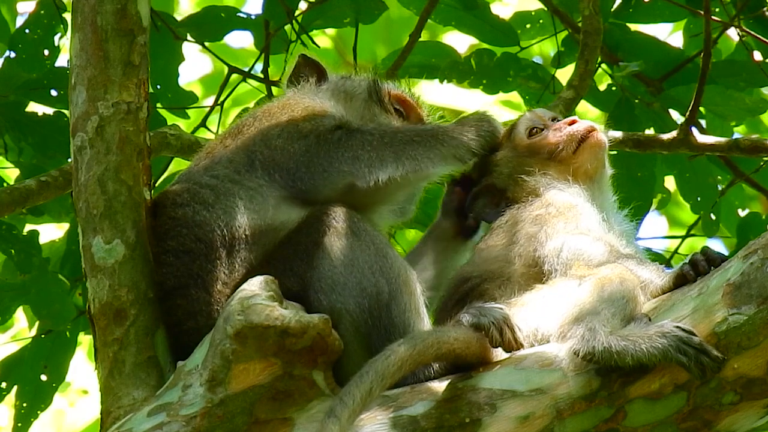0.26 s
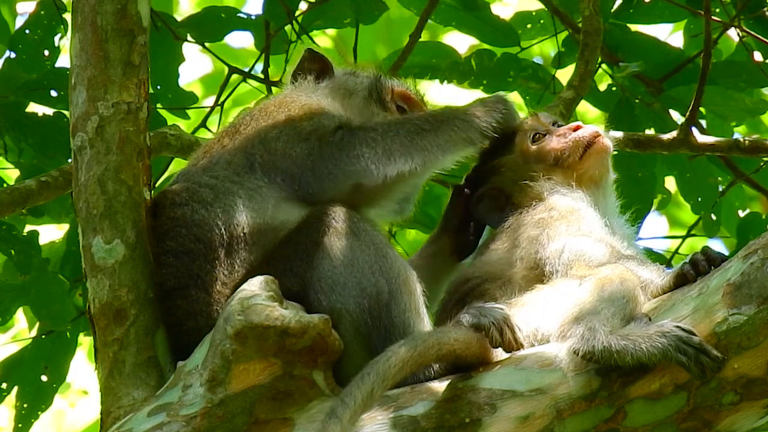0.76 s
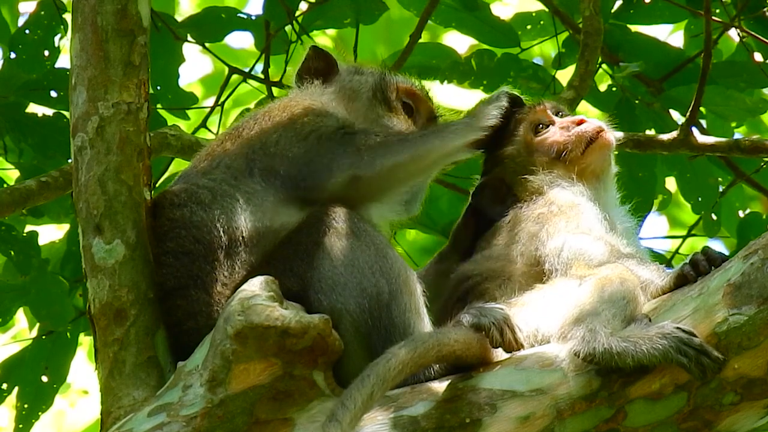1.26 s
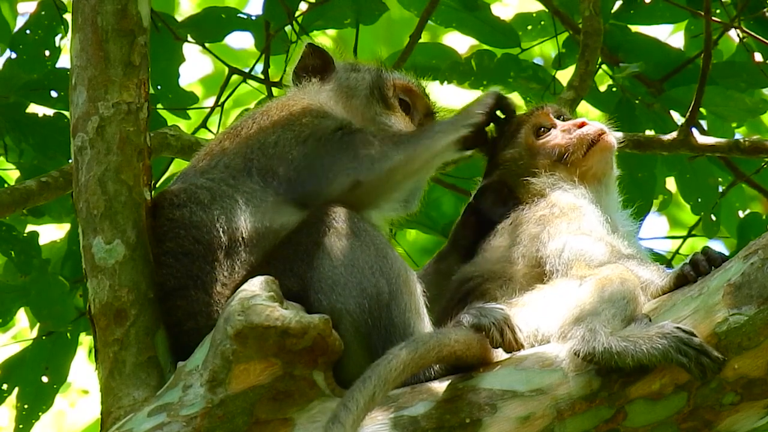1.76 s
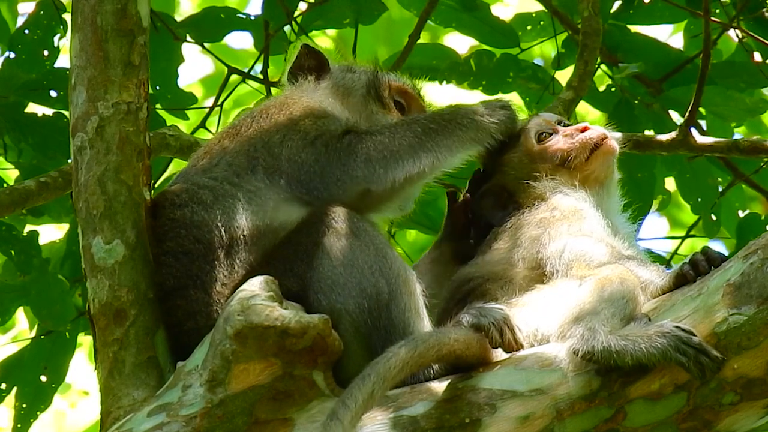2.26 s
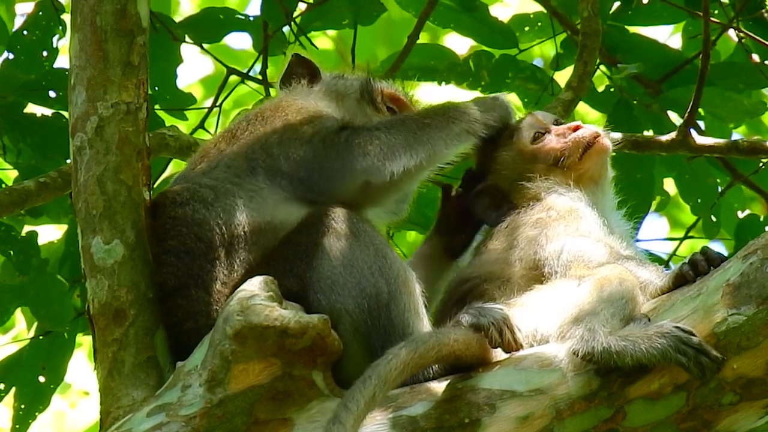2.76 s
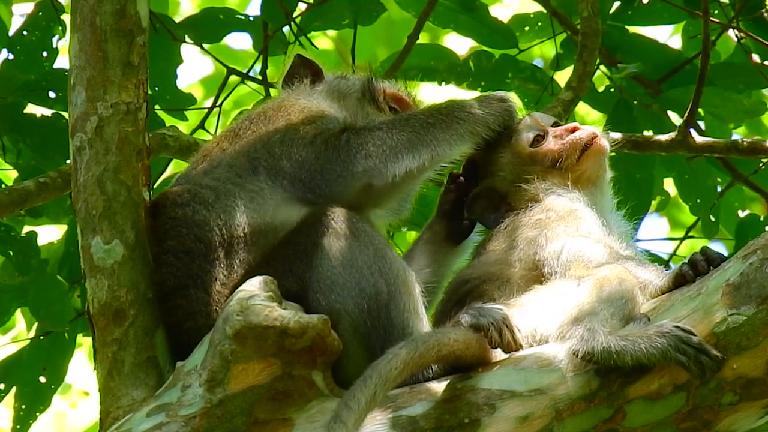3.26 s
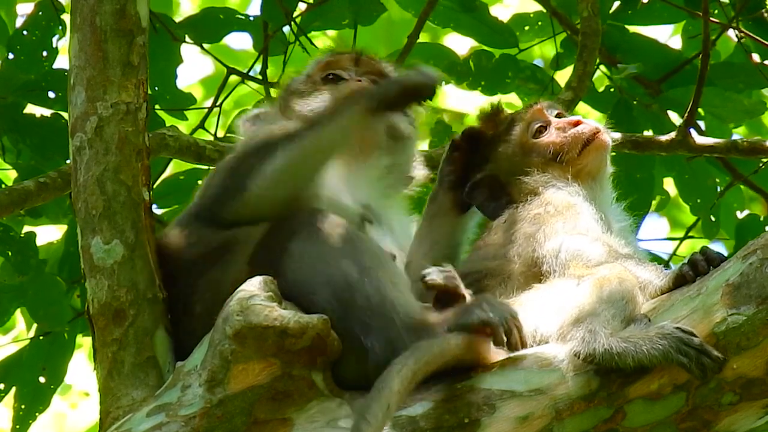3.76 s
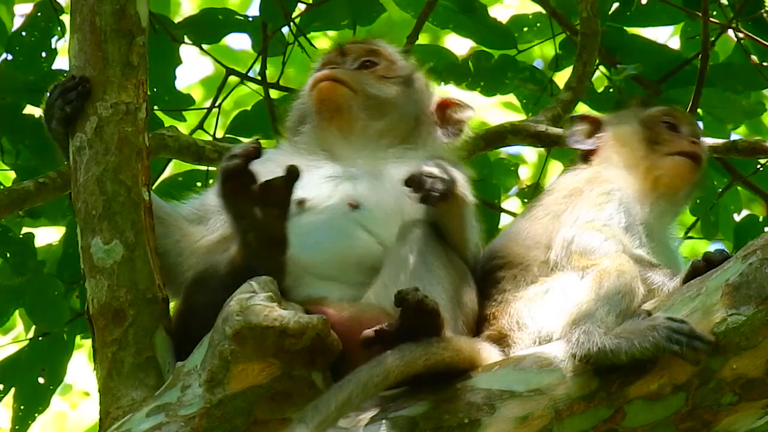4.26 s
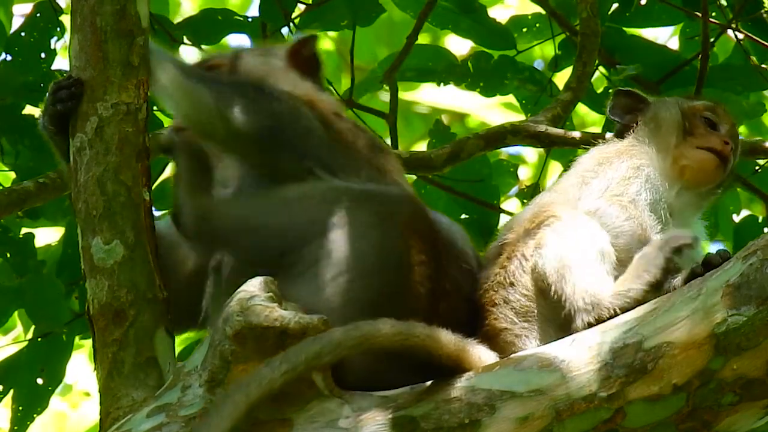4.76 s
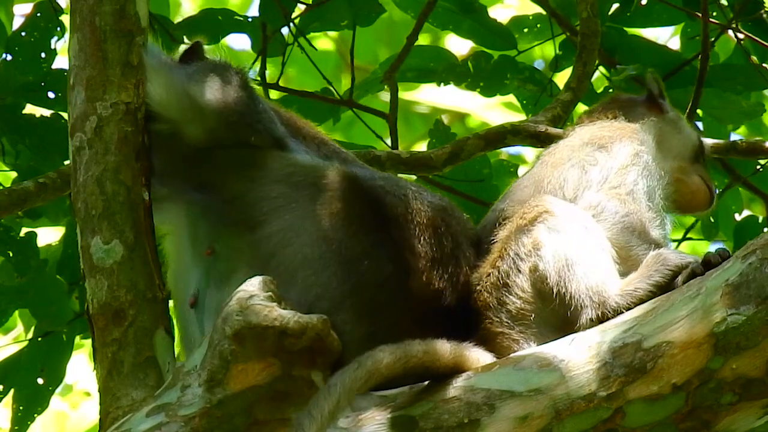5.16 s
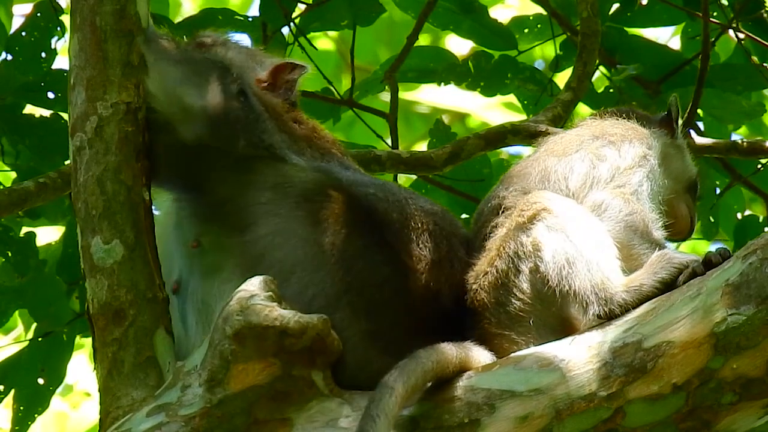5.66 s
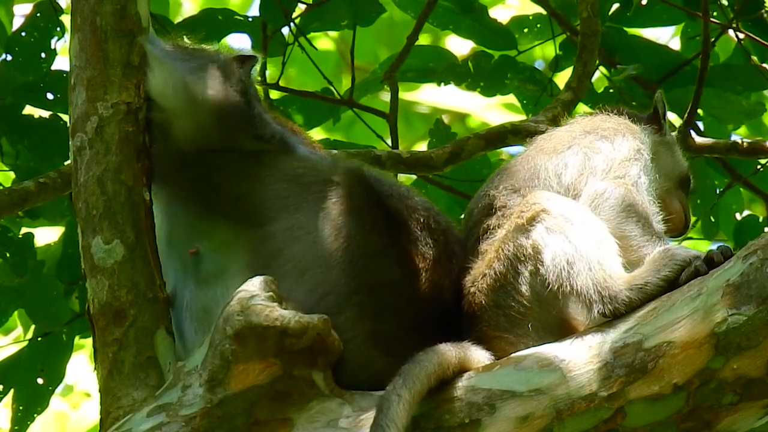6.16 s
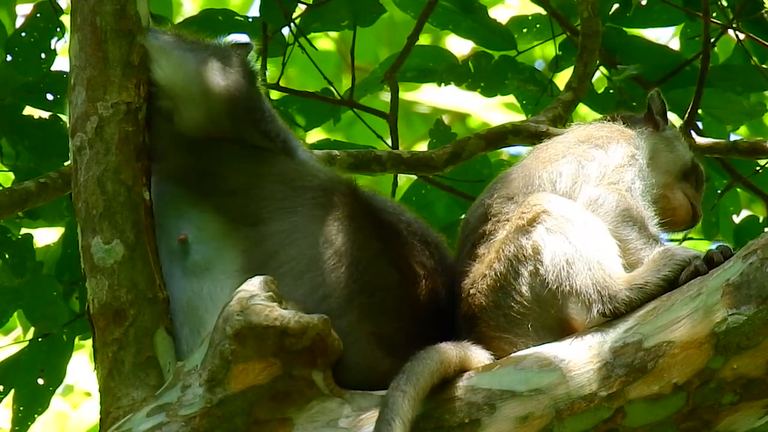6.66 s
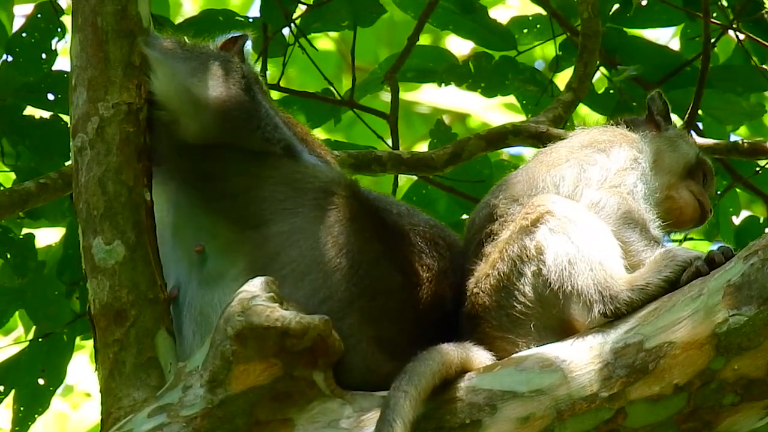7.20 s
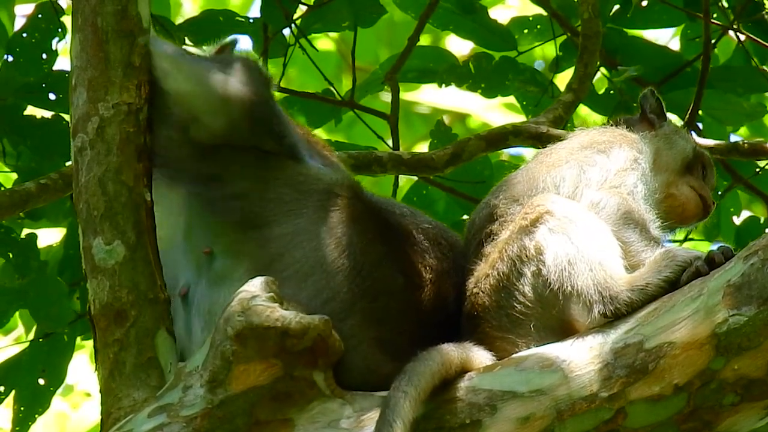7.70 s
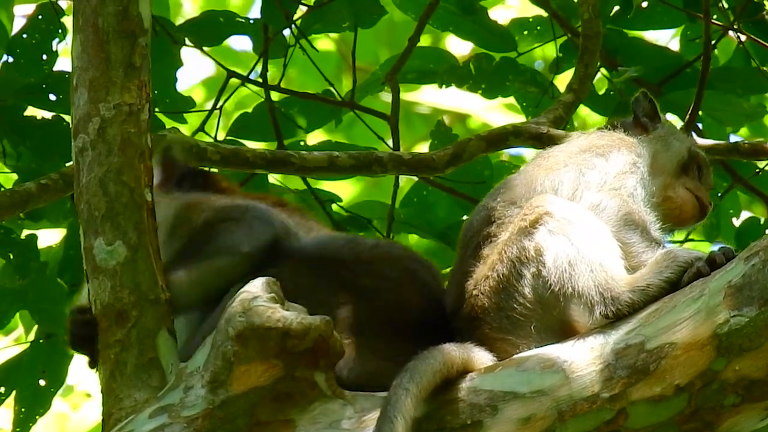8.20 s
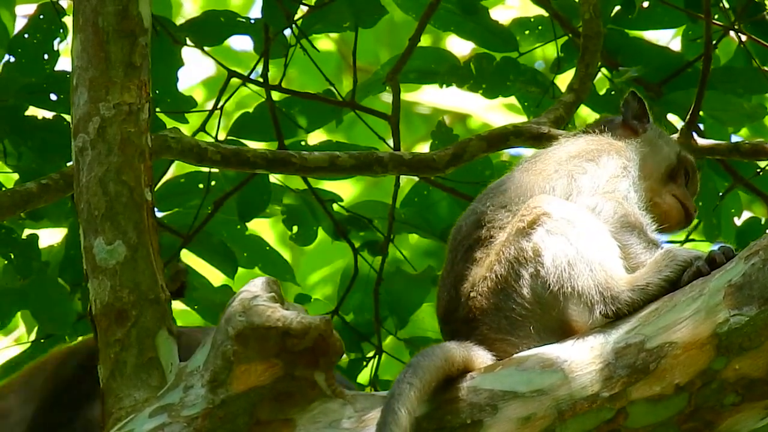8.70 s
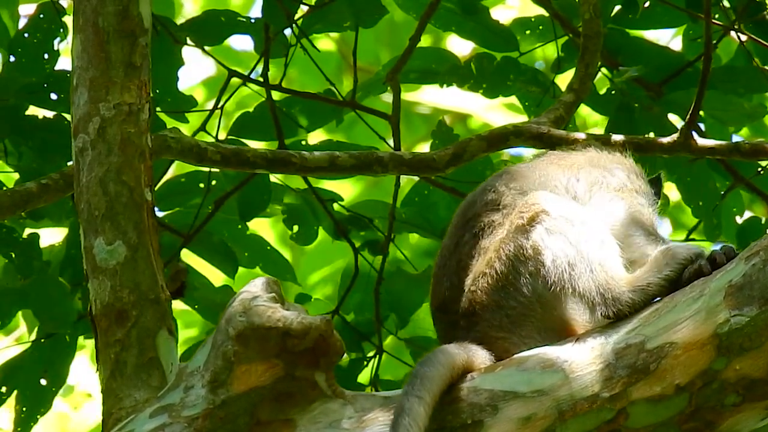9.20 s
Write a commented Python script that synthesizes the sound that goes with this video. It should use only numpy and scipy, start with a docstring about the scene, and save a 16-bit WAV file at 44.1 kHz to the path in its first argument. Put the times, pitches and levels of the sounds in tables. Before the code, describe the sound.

A tropical forest heard in wide stereo from beneath the canopy. Throughout, cicadas hold a piercing, glassy whine near seven kilohertz, trembling about eleven times a second and smeared by tree echoes, slightly left, over a low rumble, faint wavering hum and even hiss. At 0.3 seconds a bird gives a short, harsh rising call, repeated near 2.5, 4.7, 6.7 and 8.7, each with a faint echo. A distant rattling trill runs until about 2.4 and returns after 7.9; thin high chirps rise near 1.2. From 2.1 a whistler sends low, falling slurs and quick arched phrases, pausing around 4.5 to 5.7, then growing frequent to the end. Buzzy sagging chirps dot the distance, clearer after 6.7. Tiny dry leaf rustles occur throughout, with a longer soft stir around 4.4, a blunt knock at 6.45 and crisp rustling just after.

```python
"""Cicadas and birds in a tropical forest

Cicadas whine without pause: tymbal overtones swing eleven times a second, blurred by echoes from the trees.
One bird whistles low slurred phrases as bending tones; another repeats a call of tone and harsh noise.
Farther off, fluttering tones chirp and pulsing noise trills. Leaves rustle now and then in grainy noise,
over a low distant rumble, a wavering hum and the even hiss of the canopy."""
import sys
import numpy as np
from scipy import signal
from scipy.fft import rfft, irfft, next_fast_len
from scipy.io import wavfile
from scipy.ndimage import uniform_filter1d, map_coordinates

SR = 44100
rng = np.random.default_rng(int(sys.argv[2]) if len(sys.argv) > 2 else 0)


def unload_wav(signal):
    """Save mono or channel-first audio to the path in sys.argv[1] as 16-bit WAV at rate SR, clipped to [-1, 1]."""
    wavfile.write(
        sys.argv[1],
        SR,
        np.round(np.clip(np.atleast_2d(signal).T, -1, 1) * 32767).astype(np.int16),
    )


N = 416304  # samples, about 9.4 s


def amp(db):
    """Decibels to gain."""
    return 10 ** (np.asarray(db) / 20)


def unit(x):
    """Scale to rms 1."""
    return x / np.sqrt(np.mean(x ** 2) + 1e-20)


def along(points, hz):
    """Read a curve of (frequency, value) points on a log frequency axis."""
    point_hz, value = np.transpose(points)
    return np.interp(np.log(hz + 1), np.log(point_hz + 1), value)


def curves(rows):
    """One value per sample for each column after the time."""
    time_s, *columns = np.transpose(rows)
    return [np.interp(np.arange(N) / SR, time_s, column) for column in columns]


def wobble(rate):
    """A smooth random curve through normal knots, rate knots a second."""
    knots = rng.standard_normal(int(N * rate / SR) + 4)
    return map_coordinates(knots, [np.arange(N) * rate / SR])


def phase_of(hz):
    """Running phase of a moving frequency, in radians."""
    return 2 * np.pi * np.cumsum(hz) / SR


def filtered(x, response):
    """Multiply the spectrum of x by a response of frequency, without shifting phase."""
    size = next_fast_len(x.shape[-1] + 8192)
    spectrum = rfft(x, size) * response(np.fft.rfftfreq(size, 1 / SR))
    return irfft(spectrum, size)[..., :x.shape[-1]]


# likeness of left and right in sound from all around: (pitch_hz, likeness)
LEFT_RIGHT_LIKENESS = [(40, .98), (80, 0.96), (170, 0.67), (350, 0.6), (700, 0.67), (1400, 0.74),
                       (2800, 0.77), (5500, 0.25), (9000, 0), (15000, 0.18)]


def diffuse(size):
    """Stereo noise from all around: alike in the bass, mostly unrelated in the treble."""
    def mid_side_gains(hz):
        turn = np.arccos(np.clip(along(LEFT_RIGHT_LIKENESS, hz), -1, 1)) / 2
        return np.array([np.cos(turn), np.sin(turn)])

    mid, side = filtered(rng.standard_normal((2, size)), mid_side_gains)
    return np.array([mid + side, mid - side])


def rush(spectrum):
    """Coloured stereo noise of rms 1."""
    return unit(filtered(diffuse(N), lambda hz: amp(along(spectrum, hz))))


def forest(x, t60, wet_db, echo_s=0.12, echo_db=-40):
    """Direct sound, scatter from trunks and leaves, and a smeared echo from a farther stand of trees."""
    t = np.arange(SR) / SR
    decay = amp(-60 * t / t60)  # t60: seconds to fall by 60 dB
    far_stand = amp(echo_db) * np.exp(-((t - echo_s) / 0.048) ** 2)
    tail = diffuse(SR) * (decay + far_stand)
    tail *= amp(wet_db) / np.sqrt(np.sum(tail ** 2) / 2)  # wet_db: scatter over direct sound
    tail[:, 0] += 1  # the direct sound
    heard = signal.fftconvolve(np.atleast_2d(x), tail, axes=1)[:, :x.shape[-1]]
    return heard / np.sqrt(1 + amp(2 * wet_db))


def trunks(x, spread_s, db, count):
    """A few distinct copies thrown back by tree trunks, later ones weaker."""
    delays_s = spread_s * (np.arange(count) + rng.uniform(.3, 1, count)) / count
    copies = sum(amp(db - 6 * d / spread_s) * np.pad(x, (int(d * SR), 0))[:N] for d in delays_s)
    return x + copies


def swell(s, length, taper):
    """Sample indices, progress 0-1 and envelope of one note; more taper makes a softer start and end."""
    index = np.arange(max(int(s * SR), 0), min(int((s + length) * SR), N))
    progress = np.linspace(0, 1, len(index))
    return index, progress, np.abs(np.sin(np.pi * progress)) ** taper


def notes(rows, haze, flutter_rate, taper):
    """Tones that bend through three pitches; a share of each flutters at random into a band of haze."""
    out = np.zeros(N)
    random_turn = wobble(flutter_rate) + 1j * wobble(flutter_rate)
    flutter = np.sqrt(1 - haze) + np.sqrt(haze / 2) * random_turn
    for s, length, start, middle, end, db in rows:
        index, progress, shape = swell(s, length, taper)
        bend = np.polyfit([0, .5, 1], [start, middle, end], 2)
        hz = np.polyval(bend, progress)
        tone = np.real(flutter[index] * np.exp(1j * phase_of(hz)))
        out[index] += amp(db) * np.sqrt(2) * shape * tone
    return out


# overtones 4 to 7 of the tymbal rate, loudest at the fifth where the body rings: (level_db)
TYMBAL_OVERTONES = [-24.5, 2, -32, -43]


def cicada(rate_hz, swing_hz, swing_rate, t60, wet_db, jitter_hz):
    """Tymbal overtones swing in pitch; echoes of earlier swings beat against the present one."""
    swing = np.sin(phase_of(swing_rate * (1 + .035 * wobble(5))))
    phase = phase_of(rate_hz + swing_hz * swing + jitter_hz * wobble(150))
    # the overtone below the body resonance grows as the swing lifts it closer
    lift_db = 2.5 * swing + 2 * wobble(5) - 2.5
    song = np.zeros(N)
    for overtone, db in zip(range(4, 8), TYMBAL_OVERTONES):
        extra_db = lift_db if overtone == 4 else 0
        song += amp(db + extra_db) * np.sin(overtone * phase)
    # a second of song beforehand, so the trees already ring at the start
    heard = forest(np.pad(song, (SR, 0), mode="reflect"), t60, wet_db)[:, SR:]
    # the drone holds its strength from one second to the next
    power = uniform_filter1d(heard ** 2, int(.7 * SR), axis=1)
    return heard / np.sqrt(np.abs(power) + 1e-12)


# cicadas near and far, each gliding once to a new tymbal rate: (glide_start_s, glide_end_s, first_rate_hz,
# last_rate_hz, swing_hz, swings_per_s, level_db under the chorus, scatter_db over direct, jitter_hz)
CICADA_SINGERS = [(3.6, 5.6, 1454.5, 1459.3, 15, 11, 0, 10.5, 1.4),
                  (0, 8.5, 1501, 1518, 17, 10.6, -17.5, 15, 2.5),
                  (6, 8.2, 1448, 1431, 17, 11.4, -23, 15, 2.5),
                  (0, 9.4, 1552, 1560, 18, 11.2, -35.5, 15, 2.5)]
# strength of the whole chorus: (time_s, level_db)
CHORUS_STRENGTH = [(0, -35.5), (0.7, -33.5), (1.5, -35.5), (2.3, -35), (3.6, -34.5), (4.8, -34.0),
                   (6.3, -34), (7.7, -34), (9.4, -34.5)]
WAVER_DB, LEFT_DB = 1, 1.07  # wavering at each ear; gain at the left, loss at the right


def cicadas():
    """Four cicadas at different distances, a little to the left; the far ones are nearly all scatter."""
    chorus = np.zeros((2, N))
    for start, end, first_hz, last_hz, swing_hz, swing_rate, db, wet_db, jitter_hz in CICADA_SINGERS:
        rate_hz, = curves([(start, first_hz), (end, last_hz)])
        chorus += amp(db) * cicada(rate_hz, swing_hz, swing_rate, t60=1.0, wet_db=wet_db, jitter_hz=jitter_hz)
    level_db, = curves(CHORUS_STRENGTH)
    waver_db = WAVER_DB * np.array([wobble(9), wobble(9)])
    lean_db = LEFT_DB * np.array([[1], [-1]])
    return chorus * amp(level_db + waver_db + lean_db)


# the whistler's motifs, note by note: (after_beat_s, length_s, start_ratio, middle_ratio, end_ratio,
# level_db), ratios and levels relative to the song's
WHISTLE_MOTIFS = {"slur": [(0, .085, 0.98, .89, .68, 0)], "short slur": [(0.0011, .065, 0.99, .9, .87, 0)],
                  "pip": [(0.003, 0.05, 0.91, 0.98, 1, 0)], "long note": [(0, .2, 0.99, 0.85, 1.02, 0)],
                  "high arch": [(-.045, .065, .7, 1, 0.95, -1.5), (.015, .053, .93, .7, .61, -2),
                  (.13, .08, .72, .79, 0.74, 1.5), (.21, 0.079, .78, .77, 0.663, 1.5)],
                  "low arch": [(-.065, 0.039, 0.94, .72, 0.585, -5.5), (-.03, 0.041, .88, 1, 0.91, -1),
                  (.01, 0.0459, 0.92, .83, 0.767, -0.5), (.085, 0.0695, .89, .85, .79, -2.5),
                  (.185, .045, .79, .76, 0.76, -3)]}
# its song: (beat_s, motif, pitch_hz, level_db)
WHISTLE_SONG = [(2.09, "high arch", 1781, -50.5), (2.149, "pip", 991, -47), (2.775, "slur", 1705, -48),
                (3.125, "low arch", 1594, -47.5), (3.81, "short slur", 1900, -52),
                (3.92, "short slur", 1930, -52), (4.14, "pip", 930, -53.5), (4.22, "pip", 978, -49),
                (5.769, "slur", 1727, -54), (6.134, "high arch", 1770, -49), (6.86, "slur", 1720, -49.5),
                (7.29, "low arch", 1522, -48.5), (7.43, "long note", 2250, -57), (7.894, "slur", 1615, -47),
                (8.245, "low arch", 1578, -46.5), (8.501, "long note", 1220, -65),
                (8.885, "slur", 1773, -49), (9.305, "high arch", 1856, -48.5), (9.37, "pip", 990, -52)]


def whistler():
    """Falling slurs and arched phrases that linger among the trees; the lowest whistles scatter less."""
    rows = []
    for beat, motif, hz, db in WHISTLE_SONG:
        for after, length, start, middle, end, note_db in WHISTLE_MOTIFS[motif]:
            rows.append((beat + after, length, hz * start, hz * middle, hz * end, db + note_db))
    song = notes(rows, haze=.06, flutter_rate=220, taper=0.25)
    low = filtered(song, lambda hz: 1 / (1 + (hz / 1080) ** 24))  # below 1080 Hz
    high = trunks(song - low, spread_s=.17, db=-8.5, count=5)
    return forest(high, t60=2.2, wet_db=0.5, echo_s=0.2, echo_db=-21) + forest(low, t60=1, wet_db=-2)


# raspy calls: (start_s, length_s, tone_db, rasp_db, echo_delay_s, echo_db)
RASPY_CALL_TIMES = [(.294, .2, -41.5, -46.5, .22, -52), (2.495, .17, -46.5, -49, .11, -55),
                    (4.7, .2, -43.5, -49.5, .11, -51.5), (6.699, .22, -42.5, -46, .13, -49),
                    (8.748, .15, -39, -47.5, .15, -61)]
# start, middle and end of every call: (pitch_hz)
CALL_PITCHES = (3756, 3990, 4014)
# colour of the harsh noise: (pitch_hz, level_db)
RASP_COLOUR = [(1200, -21), (1900, -10), (2400, -11), (3050, -4), (3450, -12), (3850, -19), (4250, -5.5),
               (4700, -13.5), (6000, -25), (8000, -60)]
ECHO_STRETCH = 1.29  # the echo's length over the call's


def raspy_bird():
    """A rising note wrapped in harsh noise; its clear part returns, stretched, from a far stand of trees."""
    start, middle, end = CALL_PITCHES
    calls, returns, effort = [], [], np.zeros(N)
    for s, length, tone_db, rasp_db, delay, echo_db in RASPY_CALL_TIMES:
        calls.append((s, length, start, middle, end, tone_db))
        returns.append((s + delay, ECHO_STRETCH * length, middle, middle, end, echo_db))
        index, _, shape = swell(s, length, taper=0.85)
        effort[index] = amp(rasp_db) * shape
    tone = notes(calls, haze=.6, flutter_rate=350, taper=1.2)
    echo = notes(returns, haze=.9, flutter_rate=360, taper=.8)
    clear = forest(tone, t60=.7, wet_db=2) + forest(echo, t60=.6, wet_db=0)
    rasp = forest(effort * rush(RASP_COLOUR)[0], t60=1.8, wet_db=1.5)
    call = clear + rasp
    # a reflection off the ground combs the call into bands about 102 Hz apart
    bounce = round(SR / 102)
    return call + 0.28 * np.pad(call, ((0, 0), (bounce, 0)))[:, :N]


# far, buzzy chirps that all sag alike: (start_s, length_s, pitch_hz, level_db)
SAGGING_CHIRPS = [(1.486, .31, 3780, -54.5), (1.496, 0.26, 1772, -53.5), (2.291, 0.13, 3570, -53.5),
                  (2.617, 0.13, 2316, -54), (3.008, .2, 3360, -54), (3.56, 0.17, 2080, -53.5),
                  (3.761, .15, 1904, -51.5), (5.664, 0.25, 3740, -54), (6.361, 0.27, 3430, -53.5),
                  (6.758, 0.15, 1693, -48), (7.59, .12, 3440, -51), (7.809, 0.1, 2980, -53),
                  (7.88, 0.13, 1870, -47), (8.159, 0.16, 1984, -48), (8.764, 0.092, 1980, -43),
                  (9.241, 0.19, 1890, -49)]
CHIRP_SAG_HZ = 271.4  # fall over one chirp
# thin, high chirps: (start_s, length_s, pitch_hz, rise_hz, level_db)
HIGH_CHIRPS = [(.1, 0.085, 5730, 50, -55), (.66, 0.12, 5800, 60, -55), (1.17, .2, 5850, 993, -48),
               (1.26, .22, 6740, 407, -47)]


def far_birds():
    """Buzzy chirps, each a straight glide, that arrive mostly as scatter."""
    glides = [(s, length, hz, -CHIRP_SAG_HZ, db) for s, length, hz, db in SAGGING_CHIRPS]
    glides += list(HIGH_CHIRPS)
    rows = [(s, length, hz - rise / 2, hz, hz + rise / 2, db) for s, length, hz, rise, db in glides]
    song = notes(rows, haze=1, flutter_rate=640, taper=.9)
    return forest(song, t60=1.4, wet_db=9)


# bouts of a distant rattling trill: (start_s, length_s, level_db)
TRILL_BOUTS = [(0, 2.36, -54), (7.857, 1.66, -55)]
# colour of the trill: (pitch_hz, level_db)
TRILL_COLOUR = [(1800, -46), (2380, -4.5), (2640, 8.5), (2790, -3.5), (2980, 4), (3170, -20), (3800, -57)]


def trill():
    """A far bird's rattle, its notes nearly run together; each bout swells, holds and fades."""
    effort = np.zeros(N)
    for s, length, db in TRILL_BOUTS:
        index, _, shape = swell(s, length, taper=0.25)
        effort[index] = amp(db) * shape
    throb = np.sin(phase_of(9.5 + wobble(2.5)))  # about 9.5 notes a second
    return effort * amp(1.8 * throb) * rush(TRILL_COLOUR)


def far_chatter(count):
    """Faint stray whistles from deep in the forest, at random times and pitches."""
    rows = []
    for when, pitch, bend, far in rng.random((count, 4)):
        hz = 900 * 3 ** pitch  # 900 to 2700 Hz
        rows.append((when * N / SR, .07, hz * (1 + .2 * bend), hz, hz * (1 - .1 * bend), -8 * far))
    song = notes(rows, haze=.1, flutter_rate=150, taper=1)
    return amp(-59) * forest(song, t60=1, wet_db=8)


STIR_S, STIR_BODY_DB, STIR_CRISP_DB, STIR_SPREAD_DB = 0.019, -60, -61, 1  # length, top levels, their spread


def stirs(count):
    """Faint rustles at random moments, as rows like the louder ones."""
    return [(when * N / SR, STIR_S, STIR_BODY_DB - STIR_SPREAD_DB * body, STIR_CRISP_DB - STIR_SPREAD_DB * crisp)
            for when, body, crisp in rng.random((count, 3))]


# the louder rustles: (peak_s, length_s from the peak down to about an eighth, body_db, crisp_db)
LEAF_RUSTLES = [(.103, 0.085, -52, -70), (.243, 0.036, -50, -71), (.527, 0.032, -52, -68),
                (.95, 0.023, -51, -70), (.988, .015, -64, -55), (1.182, 0.032, -48, -57),
                (1.708, 0.053, -56, -55), (2.034, 0.053, -51.5, -49.5), (3.415, 0.061, -48, -65),
                (4.061, .019, -48, -68), (4.42, 0.46, -53.5, -69), (4.52, 0.13, -67, -53.5),
                (5.21, 0.03, -49, -54), (5.692, 0.1, -48.5, -52.5), (5.82, 0.078, -70, -57),
                (6.54, 0.12, -49, -50.5), (6.715, 0.072, -51.5, -53), (7.794, 0.029, -63, -57),
                (8.705, 0.017, -49, -55)]
# colours of the dull body and of the crisp edge: (pitch_hz, level_db)
BODY_COLOUR = [(150, 0), (350, 7), (800, 2.5), (1500, -4.5), (3000, -6), (6000, -47), (12000, -45)]
CRISP_COLOUR = [(1500, -1), (3500, -8), (5500, -5), (6500, -3), (8500, -10), (11000, -26), (16000, -40)]
# one soft blunt knock: (start_s, length_s, start_hz, middle_hz, end_hz, level_db)
SOFT_KNOCK = [(6.447, 0.026, 667, 668, 575, -43.5)]


def leaves():
    """Brief grainy rustles, each a dull body and a crisp edge, over faint constant stirring; one knock."""
    t, crisp = np.arange(N) / SR, np.zeros(N)
    body = amp(-61.0 + 3.8 * wobble(16))  # the constant stirring
    for s, length, body_db, crisp_db in list(LEAF_RUSTLES) + stirs(count=14):
        shape = np.exp(-2 * ((t - s) / length) ** 2)
        body = np.hypot(body, amp(body_db) * shape)
        crisp += amp(crisp_db) * shape
    grain = unit(amp(1.9 * wobble(180)))
    rustle = grain * (body * rush(BODY_COLOUR) + crisp * rush(CRISP_COLOUR))
    knock = notes(SOFT_KNOCK, haze=0.27, flutter_rate=660, taper=.8)
    return rustle + forest(knock, t60=0.23, wet_db=-17)


# colours of the distant rumble and of the canopy's hiss: (pitch_hz, level_db)
RUMBLE_COLOUR = [(18, -55), (25, -22), (33, -10), (46, -8), (58, -1), (75, -1), (90, 0.5), (115, -4),
                 (140, -4), (165, -8), (195, -9.5), (225, -13.5), (280, -36), (600, -59)]
AIR_COLOUR = [(100, 1.5), (300, 0), (500, -0.5), (750, -2.5), (1100, -4.5), (1600, -5), (2300, -7),
              (3500, -8), (5000, -6), (6800, -5.5), (7800, -10), (8200, -22.5), (10500, -18), (15700, -26)]
# wavering tones in the rumble: (pitch_hz, level_db)
HUM_TONES = [(49, -50.5), (189, -59.5)]
RUMBLE_DB, AIR_DB = -45.5, -52.5


def background():
    """A low rumble with wavering hum, slightly to the left, and the even hiss of the canopy."""
    rumble = amp(RUMBLE_DB + 0.6 * wobble(7.3)) * rush(RUMBLE_COLOUR)
    hum = np.zeros(N)
    for hz, db in HUM_TONES:
        tone = np.sqrt(2) * np.sin(phase_of(hz + 1.76 * wobble(7)))
        hum += amp(db + 1.0 * wobble(11)) * tone
    air = amp(AIR_DB + 0.2 * wobble(3.4)) * rush(AIR_COLOUR)
    lean_db = .35 * np.array([[1], [-1]])
    return (rumble + hum) * amp(lean_db) + air


def scene():
    """Everything that sounds in the forest."""
    birds = whistler() + raspy_bird() + far_birds() + trill() + far_chatter(count=60)
    return cicadas() + birds + leaves() + background()


TOP_HZ = 15750  # nothing is heard from here up


def record(dry):
    """The microphone loses the deepest bass, and the treble stops sharply at a band limit."""
    def response(hz):
        bass_cut = 1 - 1 / (1 + (hz / 33) ** 8)
        return bass_cut * (hz < TOP_HZ)

    return filtered(dry, response)


dry = scene()
out = record(dry)
unload_wav(out)
```